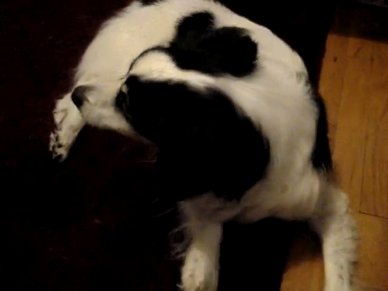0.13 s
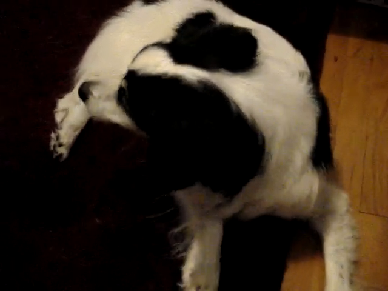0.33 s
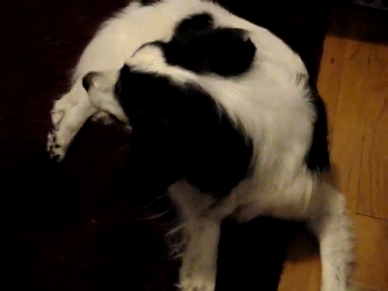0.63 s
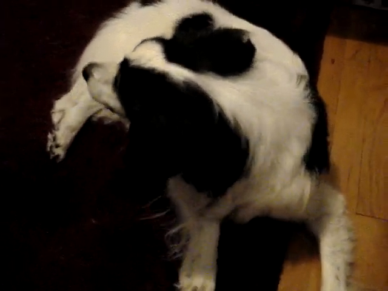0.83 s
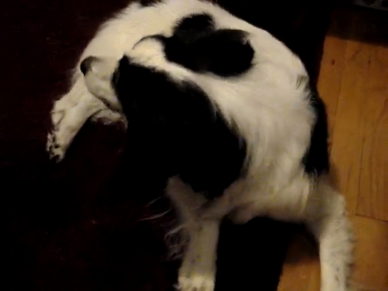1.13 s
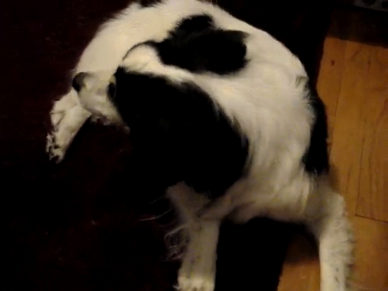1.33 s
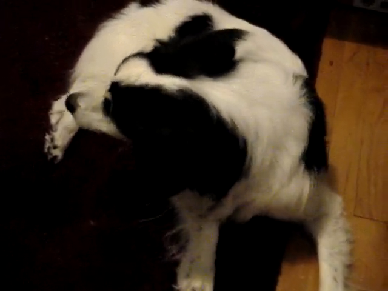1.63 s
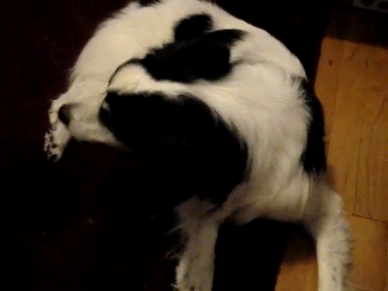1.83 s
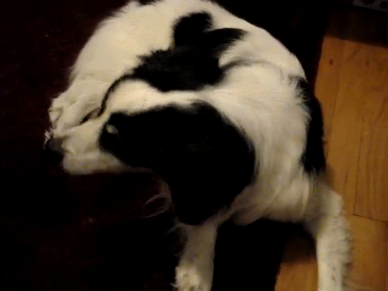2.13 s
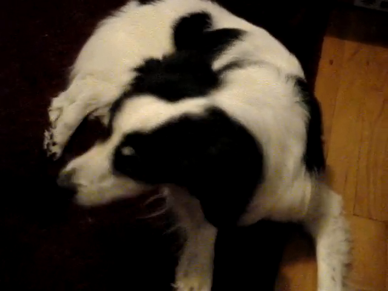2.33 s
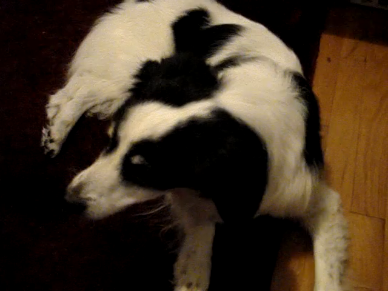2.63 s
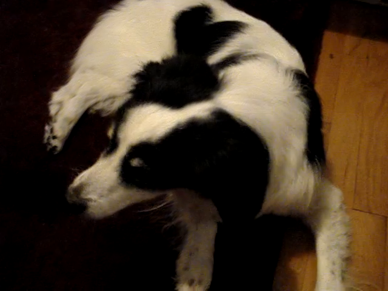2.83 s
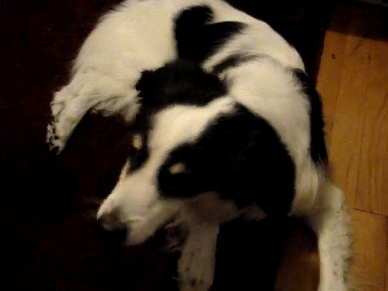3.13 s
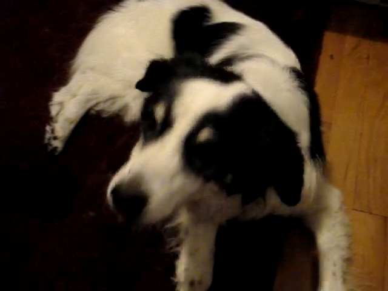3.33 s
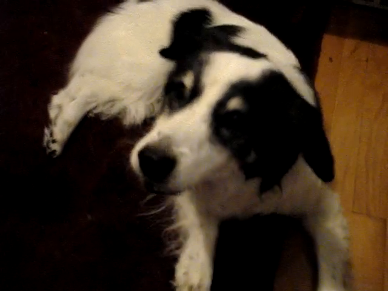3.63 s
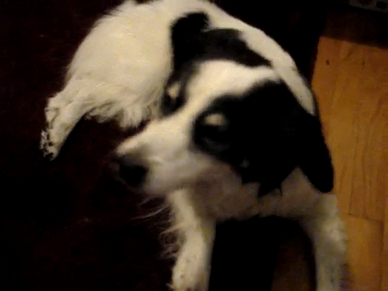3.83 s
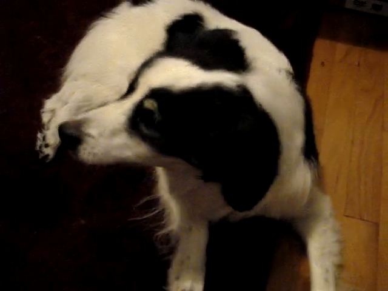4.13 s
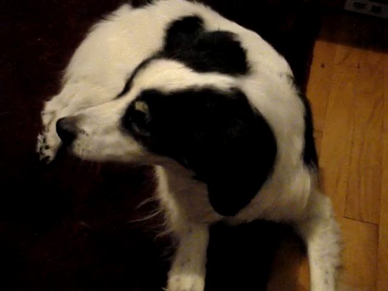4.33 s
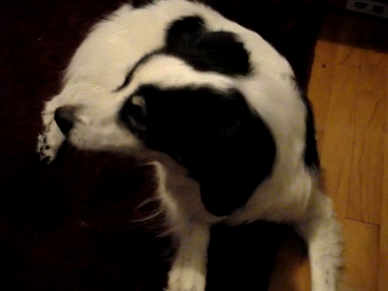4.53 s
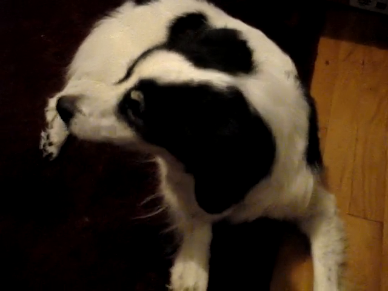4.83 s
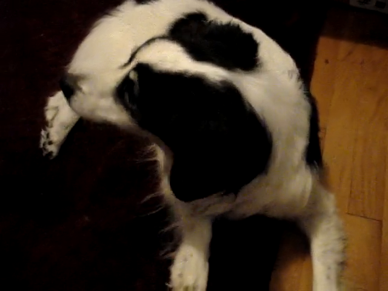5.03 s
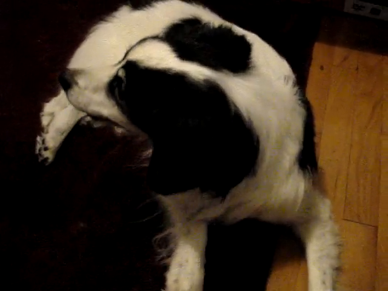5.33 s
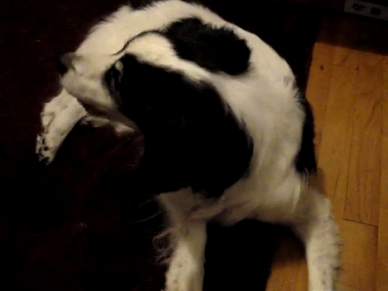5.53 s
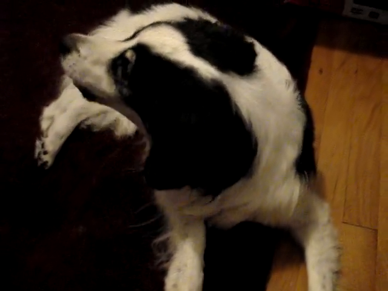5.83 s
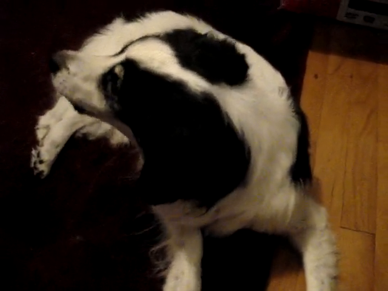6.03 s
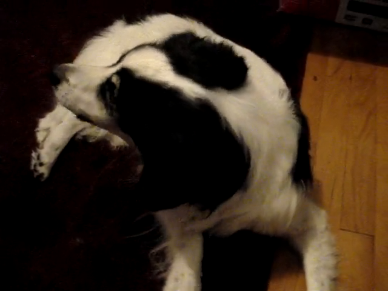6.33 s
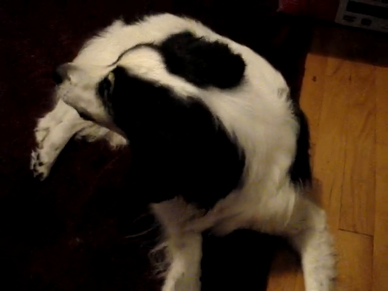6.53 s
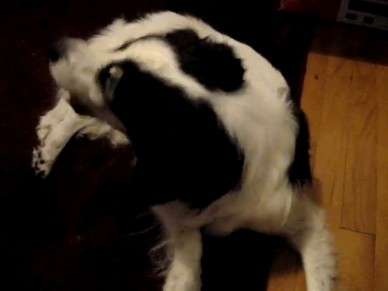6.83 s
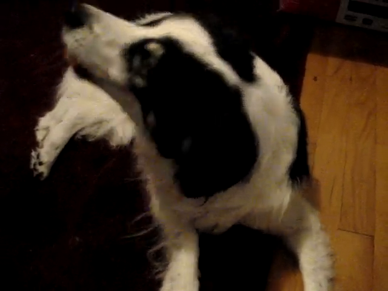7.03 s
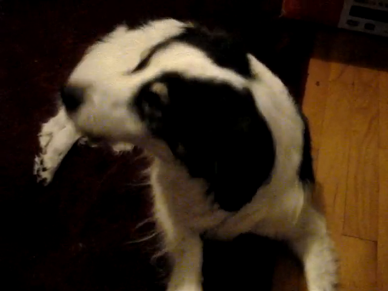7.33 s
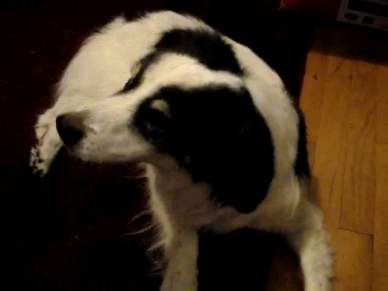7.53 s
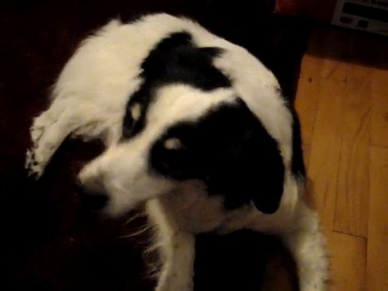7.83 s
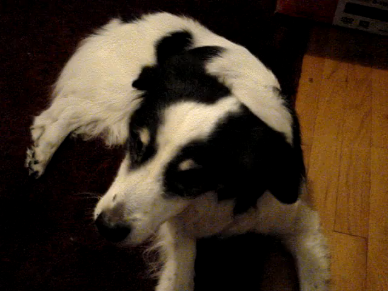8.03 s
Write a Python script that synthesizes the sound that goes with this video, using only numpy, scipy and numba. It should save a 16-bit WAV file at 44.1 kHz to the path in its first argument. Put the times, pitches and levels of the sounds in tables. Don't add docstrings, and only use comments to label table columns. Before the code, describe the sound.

A dog howls again and again in a quiet room, each cry creaking up into a clear tone and dropping off, one breaking into a yelp.

```python
import sys
import numpy as np
from scipy import signal
from scipy.fft import rfft, irfft
from scipy.io import wavfile
from scipy.ndimage import uniform_filter1d, minimum_filter1d
from numba import njit

SR = 44100
rng = np.random.default_rng(int(sys.argv[2]) if len(sys.argv) > 2 else 0)


def persist_wave(psi):
    counts = np.round(np.clip(psi, -1, 1) * 32767).astype(np.int16)
    wavfile.write(sys.argv[1], SR, np.atleast_2d(counts).T)


def linear_from_db(decibels):
    return 10 ** (np.asarray(decibels, float) / 20)


N = 360738
TIME = np.arange(N) / SR


def dog():
    # time in seconds, pitch in Hz, level in dB, overtones against the fundamental in dB.
    first_cries = [
        [(0.0, 351, -22.5, 3), (0.058, 351.8, -23, 1.5), (0.128, 352.6, -19, 3), (0.188, 352.6, -23, -3.5),
         (0.24, 257, -35, -16)],
        [(0.7, 151.3, -27, 10.5), (0.786, 313.5, -27.5, -4.5), (0.838, 364.5, -19.5, 2.5),
         (0.894, 400.6, -24.5, -2.5), (1.084, 467.8, -21.5, -3.5), (1.16, 479.2, -25, 6.5),
         (1.354, 437.3, -18, -1.5), (1.41, 249.2, -29, -19)],
        [(1.877, 204.4, -28, 5.5), (1.925, 302.6, -26, 1.5), (1.97, 337.4, -27.5, -11), (2.01, 370.4, -21, 0),
         (2.043, 385.3, -22, 8), (2.227, 417, -22.5, 2), (2.339, 399.8, -23, 6.5), (2.373, 309.7, -26, -28.5),
         (2.4, 262, -35, 1)],
    ]
    long_cries = [
        [(2.903, 264, -25, -4), (2.977, 366.5, -22, 3), (3.141, 441.8, -21, 7), (3.2, 488.5, -10.5, -3.5),
         (3.257, 527.7, -7, -4), (3.419, 569.3, -16, -0.5), (3.619, 542.3, -14.5, -4.5),
         (3.73, 469.2, -14, -12), (3.82, 266.4, -53.5, -6)],
        [(4.29, 163.5, -29, 8), (4.36, 277.6, -28.5, 12), (4.428, 333.4, -27.5, -0.5),
         (4.546, 383.7, -23.5, 14), (4.746, 421.8, -22, 1.5), (4.868, 443.5, -21, 2.5), (4.918, 409.3, -20, 9),
         (4.96, 315.7, -30, -10.5), (4.99, 241, -30.5, -5.5)],
        [(5.46, 171.9, -25.5, 12), (5.497, 318.7, -23, 0.7), (5.584, 419, -21, 4), (5.66, 468.4, -17, -1.5),
         (5.774, 523.2, -7.5, -10), (5.89, 567.8, -14, 4.5), (6.02, 563, -15, 2), (6.225, 510, -16.5, -7),
         (6.31, 299.6, -36.5, -6.5)],
    ]
    yelp = [(6.727, 316.1, -25.5, 6), (6.784, 441.7, -22, 9.5), (6.84, 550.5, -13.5, 5),
            (6.905, 575, -11, 7.5), (6.927, 625.7, -9, -6), (6.957, 668.5, -7, -2.5),
            (7.002, 725, -9, -1.5), (7.032, 854.6, -16.5, 5), (7.091, 822.5, -20.5, 17)]
    whine = [(7.22, 478, -22.5, -11), (7.438, 506.8, -18, -12), (7.528, 470.7, -23, -9),
             (7.61, 296, -45.5, -1)]
    last_cry = [(8.13, 265, -25, 2), (8.158, 320, -19, 3), (8.18, 350, -21, 3)]
    # upper partials in dB, hoarseness 0-1, length of opening rasp in seconds.
    voices = [(-4.5, 0.06, 0.011), (-4, 0.3, 0.148), (1.5, 0.22, 0.14), (0.7, 0.13, .14),
              (-0.5, 0.18, 0.15), (2.5, 0.26, .17), (-1.5, 0, 0.15), (1, 0, .08)]
    # start in seconds, length in seconds,
    # level reached in dB.
    creaks = [(0.61, .055, -28), (1.782, .045, -29), (2.795, .04, -30), (4.2, .055, -36),
              (5.365, .05, -27.5), (6.668, .022, -38), (8.062, .035, -35.5)]
    cries = first_cries + long_cries + [yelp + whine, last_cry]
    howls = np.zeros(N)
    for rows, creak, voice in zip(cries, [None] + creaks, voices):
        howls = howls + cry(with_creak(rows, creak), *voice)
    return howls


def with_creak(rows, creak):
    if creak is None:
        return np.array(rows)
    start_s, length_s, reached_db = creak
    overtones_db = 7.5
    opening_clicks = [(start_s, 78, -50, overtones_db),
                      (start_s + length_s, 111.64, reached_db, overtones_db)]
    return np.array(opening_clicks + rows)


def cry(rows, upper_db, hoarse, rasp_s):
    # time in seconds, strain 0-1.
    strain = [(6.7, 0.01), (6.79, 0.37), (6.845, 0.48), (6.9, 0.34), (6.925, 0.65), (6.98, 0.35),
              (7.012, 0.76), (7.06, 0.36), (7.24, 0)]
    top_hz, step = 9850, 32
    s, *columns = rows.T
    start = int(s[0] * SR)
    t = TIME[start:int(s[-1] * SR)]
    hz, level_db, overtone_db = (
        uniform_filter1d(np.interp(t, s, c), size=700, mode="nearest") for c in columns)

    glide = uniform_filter1d(np.abs(np.gradient(np.log(hz))) * SR, size=1500)
    slack = np.clip(np.clip(210 / hz, 0, 1) ** 2.5 + glide / 20, 0, 1)
    rasp = np.exp(-((t - t[0]) / rasp_s) ** 4)
    rough = np.clip(slack + hoarse + 0.6 * rasp + np.interp(t, *np.transpose(strain)), 0, 1)
    opening = np.clip((hz - 440) / 80, 0, 1)

    jitter = 0.001 + 0.085 * slack ** 1.5 + 0.016 * rough ** 1.5
    hz = hz * (1 + 0.0015 * walk(30, len(t)) + jitter * walk(170, len(t)))
    phase = 2 * np.pi * np.cumsum(hz) / SR

    k = np.arange(1, 29)[:, None]
    slow = slice(0, None, step)
    f = k * hz[slow]
    db = throat(f, t[slow], opening[slow])
    db += (k > 1) * np.where(k == 3, 0.55, 1) * overtone_db[slow]
    dull_db = np.clip(17 * np.log2(f[0] / 524.4), -15.5, 0) + upper_db
    db += np.clip((f - 1300) / 400, 0, 1) * dull_db
    db -= 7 * np.clip((150 - f[0]) / 50, 0, 1) * np.log2(np.maximum(f / 300, 1))
    db += level_db[slow] - 10 * np.log10(np.sum(linear_from_db(2 * db), axis=0))

    patches, flicker, drift = (
        np.array([walk(rate * step, f.shape[1]) for _ in k]) for rate in (22, 80, 5))
    db += np.where(k > 2, 2.7, 0.8) * patches
    db += (0.95 + 3.7 * rough[slow] + f / 4500) * flicker * np.clip(f[0] / 300, 0.3, 1)
    db -= 18 * rough[slow] * np.clip(f / 3000 - 1, 0, 1)
    turn = 2.0 * drift * (1 - slack[slow]) * (1 - 1.1 * opening[slow]) - 0.5 * k * (k < 6)

    gains, turn = (uniform_filter1d(np.repeat(v, step, axis=1), step)[:, :len(t)]
                   for v in (linear_from_db(db) * (f < top_hz), turn))
    tone = -np.sqrt(2) * np.sum(gains * np.cos(k * phase + turn), axis=0)
    effort = np.sqrt(np.sum(gains ** 2, axis=0))
    voice = tone * (1 - 0.13 * rasp) + breath(phase, effort, rough, slack, opening)
    edge = np.clip(np.minimum(t - t[0] + (s[0] == 0), t[-1] - t) / 0.0055, 0, 1)
    return np.pad(voice * edge, (start, N - start - len(t)))


def throat(f, t, opening):
    # frequency in Hz, level in dB.
    mouth_shut = [(250, 4), (400, -3), (750, 2), (1050, -12.5), (1320, -6), (1650, -20), (2000, -11.5),
                  (2450, -10.5), (2900, -31.5), (3700, -24), (4300, -42.5), (5200, -27), (7000, -33),
                  (9900, -45)]
    mouth_open = [(500, 11), (1100, 2.5), (1700, -8), (2250, -5.5), (2800, -13.5), (3400, -23), (4100, -46),
                  (4600, -25.5), (5100, -17), (5700, -26.5), (6400, -24), (7300, -28.5), (8500, -39.5),
                  (9900, -53)]
    # time in seconds, frequency in Hz.
    lips = [(0, 1900), (.7, 2230), (1.2, 1860), (1.35, 2247), (2.2, 2140), (2.9, 1860), (3.2, 1945),
            (3.32, 2615), (3.7, 2590), (4.4, 1710), (4.85, 2550), (5.6, 1850), (5.9, 2114), (6.15, 2540),
            (6.75, 1824), (6.89, 2345), (7.05, 1845), (7.4, 1900)]
    jaw = opening * np.maximum(np.clip((7.17 - t) / 0.1, 0, 1), f > 2900)
    db = (1 - jaw) * shape(mouth_shut, f) + jaw * shape(mouth_open, f)
    lips_hz, lips_width_hz = np.interp(t, *np.transpose(lips)), 131
    db += 7.5 * np.exp(-((f - lips_hz) / lips_width_hz) ** 2)
    ring_hz, ring_width_hz = 735, 45
    db += 6 * np.exp(-((f - ring_hz) / ring_width_hz) ** 2)
    return db


def breath(phase, effort, rough, slack, opening):
    # centre in Hz, width in Hz, level in dB.
    cavities = [(694, 770, -4), (1164, 690, -9.5), (2040, 910, -1.5), (3060, 990, -19), (5600, 770, -13.5),
                (6500, 510, -17), (8900, 1200, -24)]
    # centre in Hz, width in Hz, level in dB.
    chest = (304, 62, -18.5)
    puff = rng.standard_normal(len(phase)) * (1 + 0.25 * np.cos(phase))
    puff = puff * effort * linear_from_db(-23.5 + 12.4 * rough)
    air = hiss(puff * (1 - opening), *chest)
    for hz, width, db in cavities:
        air = air + hiss(puff * (1 - 0.49 * slack * (hz > 1800)), hz, width, db)
    return air - opening * resonance(air, 4100, 670)


def hiss(puff, hz, width, db):
    twice = resonance(resonance(puff, hz, width), hz, width)
    return linear_from_db(db) * twice * np.sqrt(SR / width) / 2


def resonance(x, hz, width):
    return signal.lfilter(*signal.iirpeak(hz, hz / width, SR), x)


def shape(table, hz):
    f, db = np.transpose(table)
    return np.interp(np.log(np.maximum(hz, 1)), np.log(f), db)


def walk(rate, size):
    k = int(SR / rate)
    held = np.repeat(rng.standard_normal(size // k + 1), k)
    return 1.3 * uniform_filter1d(uniform_filter1d(held, k), k)[:size]


def ticks():
    # start in seconds, peak in dB, frequency in Hz.
    clicks = [(1.5515, -36.5, 2480), (1.883, -32, 2430), (4.3792, -32, 3706), (5.353, -36.5, 4300),
              (5.4011, -18, 3190), (7.883, -38, 4260)]
    out, t = np.zeros(N), TIME[:600]
    for s, db, hz in clicks:
        ring = np.exp(-t / 0.00059) * np.sin(2 * np.pi * hz * t)
        scrape = 0.5 * np.exp(-t / 0.0011) * rng.standard_normal(len(t))
        start = int(s * SR)
        out[start:start + len(t)] += linear_from_db(db) * (ring + scrape)
    return out


def room(near):
    # frequency in Hz, width in Hz, level in dB.
    standing_waves = [(294.2, 16, -4), (324, 14, -16.5), (561.6, 37, -3.5), (672, 7.8, 0), (722, 11, -1),
                      (884, 4.7, -15.5), (826, 13, -18), (1115, 18, -5), (1275, 24, 0), (1716.4, 18, 13.5),
                      (1850, 22, 7.5), (2020, 8.1, -23.5), (2520, 5.6, -2), (2700, 19, -1.5)]
    t60_s, damp = 0.3, 0.1
    lags = np.array([331, 467, 613, 797, 1009, 1231, 1487, 1789])
    out = linear_from_db(-18) * walls(near + 1e-18, lags, linear_from_db(-60 * lags / SR / t60_s), damp)
    for hz, width, db in standing_waves:
        out = out + linear_from_db(db) * resonance(near, hz, width)
    return out


@njit
def walls(x, lags, gain, damp):
    line, soft, out = np.zeros((8, 4096)), np.zeros(8), np.zeros(len(x))
    for i in range(len(x)):
        total = 0.
        for k in range(8):
            soft[k] += (1 - damp) * (gain[k] * line[k, (i - lags[k]) & 4095] - soft[k])
            total += soft[k]
            out[i] += soft[k] * (1 - 2 * (k % 2))
        for k in range(8):
            line[k, i & 4095] = x[i] + soft[k] - total / 4
    return out


def hush(near):
    # frequency in Hz, level in dB per Hz.
    murmur = [(15, -67), (25, -23.5), (65, -13.5), (220, -11.5), (262, -8.5), (391, -15.5), (466, -9),
              (555, -9), (695, -12), (870, -11), (1010, -13.5), (3270, -21.5), (9830, -29.5),
              (12800, -68.5), (21600, -120)]
    # time in seconds, whole band in dB,
    # extra bass in dB, seconds until the bass is back.
    steps_down = [
        (3.8, -5, -24.5, 0.4),
        (6.33, -3, -14, 0.2),
        (7.028, 4, -19, 0.34),
        (7.6, -7.5, -20, 3.0),
    ]
    noise = irfft(rfft(rng.standard_normal(N)) * linear_from_db(shape(murmur, np.fft.rfftfreq(N, 1 / SR))), N)
    noise *= linear_from_db(-44.5) / noise.std()
    loud_db = 10 * np.log10(np.abs(uniform_filter1d(near ** 2, size=6000)) + 1e-9)
    spill = np.clip((loud_db + 18.5) / 16.5, 0, 1)
    all_db, bass_db = -6.5 + 12.5 * spill, 3.5
    for s, db, low_db, back_s in steps_down:
        since = np.maximum(TIME - s, 0)
        step = np.minimum(since / 0.063, 1)
        all_db = all_db + db * step * np.exp(-since / 2.2)
        bass_db = bass_db + low_db * step * np.exp(-since / back_s)
    bass = signal.sosfiltfilt(signal.butter(2, 220, fs=SR, output="sos"), noise)
    return linear_from_db(all_db) * (noise - bass + bass * linear_from_db(bass_db))


def scene():
    near = dog() + ticks()
    return (near + room(near) + hush(near))[None]


def roll_off(x):
    return signal.sosfilt(signal.butter(12, 15700, fs=SR, output="sos"), x)


def record(dry):
    limit, knee, knee_room, hard_floor = 0.46, 0.56, 0.2, -0.712
    room_left = minimum_filter1d(limit / np.maximum(dry, limit), size=441)
    x = dry * uniform_filter1d(room_left, size=331)
    rumble_band = signal.butter(2, (22, 110), "bandpass", fs=SR, output="sos")
    x = x + linear_from_db(-9.5) * signal.sosfilt(rumble_band, x ** 4)
    x = np.where(x < -knee, -knee + knee_room * np.tanh((x + knee) / knee_room), x)
    x = signal.sosfilt(signal.ellip(12, 0.2, 75, 9850, fs=SR, output="sos"), x)
    return roll_off(np.maximum(x, hard_floor))


dry = scene()
out = record(dry)
persist_wave(out)
```